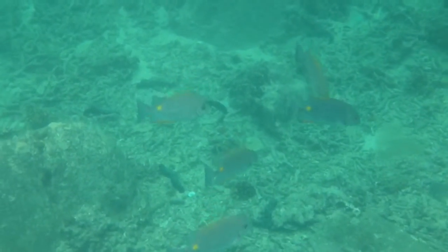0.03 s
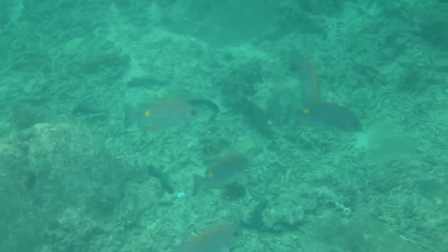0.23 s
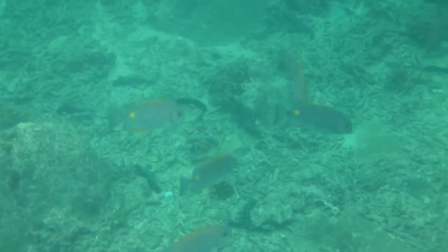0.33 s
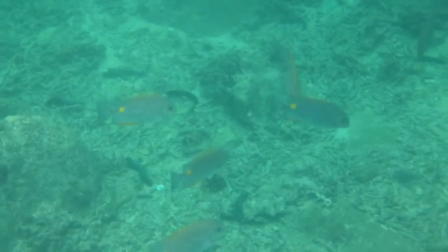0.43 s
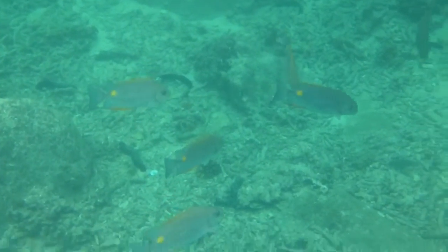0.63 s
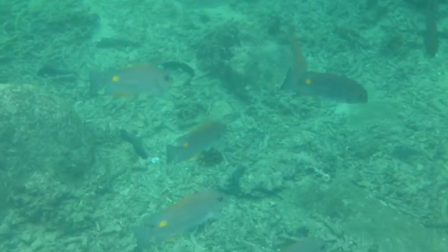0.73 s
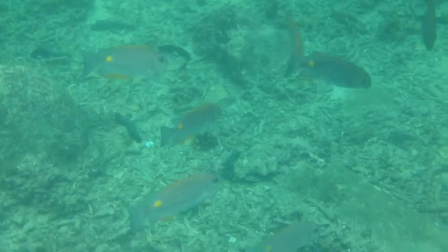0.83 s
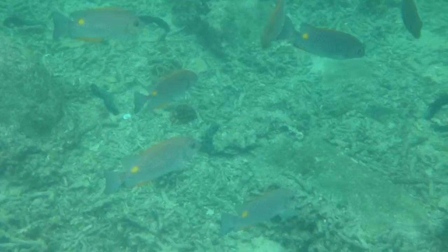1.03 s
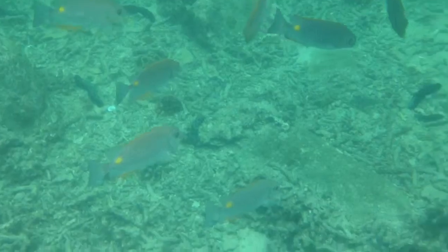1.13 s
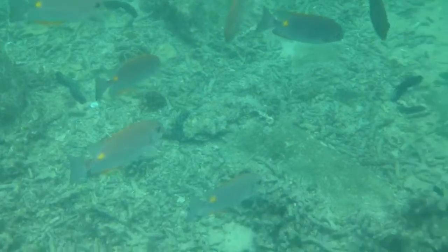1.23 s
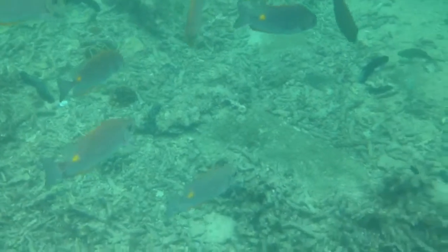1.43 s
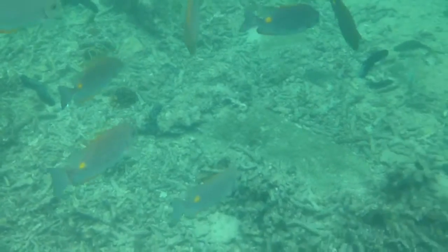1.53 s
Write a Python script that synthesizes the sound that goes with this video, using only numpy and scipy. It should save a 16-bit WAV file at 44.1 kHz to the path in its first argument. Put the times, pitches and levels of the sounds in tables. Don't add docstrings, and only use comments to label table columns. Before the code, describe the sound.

Dry underwater crackling of snapping shrimp, with muffled water thumps and a soft surging hum

```python
import sys
import numpy as np
from scipy import signal
from scipy.io import wavfile
from scipy.ndimage import uniform_filter1d

SR = 44100
rng = np.random.default_rng(int(sys.argv[2]) if len(sys.argv) > 2 else 0)


def file_out(sig):
    cols = np.atleast_2d(sig).T
    lim = np.clip(cols, -1, 1)
    pcm = np.round(lim * 32767).astype(np.int16)
    wavfile.write(sys.argv[1], SR, pcm)


def rack_gain(trim_db):
    fader = np.asarray(trim_db, float)
    return 10 ** (fader / 20)


N = 70560

ECHO_S = 0.001598


def rms_one(x):
    return x / np.sqrt(np.mean(x ** 2) + 1e-20)


def peak_one(x):
    return x / np.abs(x).max()


def cut(x, hz, kind, order=3):
    return signal.sosfilt(signal.butter(order, hz, kind, fs=SR, output="sos"), x)


def drift(rate_hz):
    r = np.exp(-2 * np.pi * rate_hz / SR)
    white = rng.standard_normal(N + SR)
    return rms_one(signal.lfilter([1], [1, -2 * r, r * r], white)[SR:])


def grains(rate_per_s, spread_db):
    sizes = rack_gain(spread_db * np.minimum(rng.exponential(1, N), 4.0)) * rng.choice([-1, 1], N)
    return sizes * (rng.random(N) < rate_per_s / SR)


def resonate(x, peaks):
    out = 0
    for k, (hz, width, db) in enumerate(peaks):
        r = np.exp(-np.pi * 1.5 * width / SR)
        b = np.array([1, 0, -1]) * (1 - r * r) / 2
        a = [1, -2 * r * np.cos(2 * np.pi * hz / SR), r * r]
        once = signal.lfilter(b, a, x + 1e-18)
        out = out + (-1) ** k * rack_gain(db) * signal.lfilter(b, a, once)
    return out


def shell_ring(x):
    # (frequency [Hz], width [Hz], level [dB])
    shell_modes = [(720, 230, 8.3), (1190, 523, 2.7), (1510, 374, 6.3), (2030, 680, 1.33)]
    return cut(resonate(x, shell_modes), 2500, "low")


def port_ring(x, hz):
    port_mode = [(hz, 1470, 0)]
    return resonate(resonate(x, port_mode), port_mode)


def edge_ring(x):
    # (frequency [Hz], width [Hz], level [dB])
    edge_modes = [(5960, 1900, 17), (7510, 2700, 0)]
    return resonate(resonate(x, edge_modes), edge_modes)


def reef_paths():
    scatter_db, scatter_t60_s, scatters_per_s = -17.5, 0.055, 2500
    t = np.arange(SR // 10) / SR
    paths = rng.standard_normal(len(t)) * (rng.random(len(t)) < scatters_per_s / SR)
    paths = paths * rack_gain(scatter_db - 60 * t / scatter_t60_s) * (t > ECHO_S)
    paths[0] = 1
    bounce_s = rng.uniform(0.00025, 0.0008)
    paths[int(bounce_s * SR)] = rack_gain(-6) * rng.choice([-1, 1])
    paths[int(ECHO_S * SR)] = rack_gain(-19.5)
    return paths


def near_shrimp():
    # (time [s], shell level [dB], port level [dB], rim level [dB], port pitch [Hz])
    early_snaps = [(0.0145, -54, -42.5, -54, 3900), (0.0211, -49.5, -34, -37.5, 4300),
                   (0.060, -48, -41, -64, 3900), (0.0657, -39, -38, -59.0, 3750),
                   (0.0879, -35.5, -32.5, -49, 4000), (0.092, -38.5, -36.5, -58, 5440),
                   (0.1159, -48.5, -37.5, -44, 3860), (0.1422, -52, -45, -49, 5200),
                   (0.1605, -76, -44, -49, 4700), (0.2255, -76, -63, -63, 4660),
                   (0.2567, -42, -44.5, -64, 4070), (0.2624, -73, -48, -50, 5170),
                   (0.2864, -46.5, -39.5, -62, 4300), (0.3174, -45, -36.5, -66, 4070),
                   (0.3446, -55, -45, -54, 3900), (0.3933, -41.5, -33.5, -39, 4430),
                   (0.4035, -46.0, -48, -53, 4740), (0.426, -59, -59, -60.0, 4800),
                   (0.4303, -73, -43.0, -51, 4300), (0.5165, -50.5, -43.5, -56, 4070)]
    # (time [s], shell level [dB], port level [dB], rim level [dB], port pitch [Hz])
    middle_snaps = [(0.5419, -52, -43.5, -47.5, 4850), (0.6097, -44.5, -44, -51, 3800),
                    (0.6172, -50, -44.5, -54, 4460), (0.6729, -44.5, -33, -46, 4410),
                    (0.689, -69, -47, -46, 4600), (0.722, -48.5, -59, -55, 5000),
                    (0.8122, -32.5, -33.5, -61, 4330), (0.8414, -32.5, -32, -39.5, 4570),
                    (0.8454, -55, -40, -64.0, 4130), (0.8503, -48, -52, -71, 3900),
                    (0.8925, -48, -45, -59, 4080), (0.936, -50, -53, -62, 4100),
                    (0.9409, -41.5, -31, -40.5, 4440), (1.004, -46, -46.5, -60, 4400),
                    (1.0192, -54, -46, -59, 4340), (1.0365, -40, -43, -64.0, 4000),
                    (1.0442, -33, -45, -55, 3830), (1.047, -41.5, -38.5, -58, 3660),
                    (1.08, -48, -35, -36, 4450), (1.1178, -55, -62, -60, 4750)]
    # (time [s], shell level [dB], port level [dB], rim level [dB], port pitch [Hz])
    late_snaps = [(1.1341, -30.5, -28.5, -43, 3600), (1.136, -47, -39, -56, 4230),
                  (1.158, -53, -46, -57, 4150), (1.214, -44, -65, -70, 4500), (1.2741, -51, -58, -52, 4350),
                  (1.293, -44.5, -46, -53, 3900), (1.3286, -39.5, -62, -49.5, 3240),
                  (1.335, -41.5, -57, -55, 4540), (1.3648, -48, -40.5, -51, 4300),
                  (1.4072, -50, -43, -52, 3680), (1.434, -38, -27.5, -41, 4660),
                  (1.4483, -49.5, -62, -49, 5500), (1.4788, -54.0, -40.5, -65.0, 4100),
                  (1.4899, -58, -52, -50, 5700), (1.4975, -59, -42.0, -62.0, 4340),
                  (1.507, -55, -45, -60, 4300), (1.5519, -44.5, -47, -52, 5350),
                  (1.5563, -49, -41.5, -64.0, 4000), (1.561, -44.5, -39, -62.0, 3980),
                  (1.5732, -45.5, -46, -52, 4440)]
    lead_s, lead_db = 0.00157, -17.5
    out = np.zeros(N + SR)
    click = np.arange(SR // 40) == 0
    shell = peak_one(shell_ring(click))
    edge = peak_one(edge_ring(click)) + rack_gain(-5) * cut(click, 9000, "high")
    for s, shell_db, port_db, edge_db, hz in early_snaps + middle_snaps + late_snaps:
        port = peak_one(port_ring(click, hz))
        ring = rack_gain(shell_db) * shell + rack_gain(port_db) * port + rack_gain(edge_db) * edge
        snap = signal.fftconvolve(ring, reef_paths())
        start, jet = int(s * SR), int((s - lead_s) * SR)
        out[start:start + len(snap)] -= snap
        out[jet:jet + len(port)] += rack_gain(port_db + lead_db) * port
    return out[:N]


def pops():
    # (time [s], peak level [dB], first pitch [Hz], last pitch [Hz], decay time [s])
    pop_events = [
        (.0654, -41, 2400, 1000, .0012),
        (1.1341, -32, 2600, 900, .002),
        (1.2092, -33, 2200, 1100, .0015),
        (1.2103, -33, 1500, 800, .002),
        (1.3287, -25, 2900, 760, .002),
        (1.3317, -38, 1900, 1300, .003),
    ]
    fall_s, rise_s = 0.00034, 0.00016
    out, t = np.zeros(N + SR), np.arange(SR // 40) / SR
    for s, db, first_hz, last_hz, dying_s in pop_events:
        cycles = last_hz * t + (first_hz - last_hz) * fall_s * (1 - np.exp(-t / fall_s))
        pop = (1 - np.exp(-t / rise_s)) * np.exp(-t / dying_s) * np.sin(2 * np.pi * cycles)
        paths = reef_paths()
        paths[1:int(ECHO_S * SR)] = 0
        pop = signal.fftconvolve(pop, paths)
        start = int(s * SR)
        out[start:start + len(pop)] += rack_gain(db) * pop
    return out[:N]


def swelling_tones(events):
    sag_per_cycle = 0.025
    out, t = np.zeros(N + SR), np.arange(SR // 10) / SR
    for s, db, hz, swell in events:
        u = t * hz / swell
        cycles = np.log1p(sag_per_cycle * u / swell) / sag_per_cycle * swell ** 2
        tone = u * np.exp(1 - u) * np.sin(2 * np.pi * cycles)
        start = int(s * SR)
        out[start:start + len(t)] -= rack_gain(db) * cut(tone, 2.6 * hz, "low", order=2)
    return out[:N]


def water_knocks():
    # (time [s], peak level [dB], pitch [Hz], swell [cycles])
    knock_events = [(0.0655, -29.5, 98, 0.28), (0.107, -43, 150, 0.9), (.168, -33, 570, 1.2),
                    (0.193, -36.5, 168, 1.07), (.214, -35, 150, 0.88), (0.2357, -14, 198, 0.35),
                    (0.25, -36, 620, 0.86), (.256, -37, 173, 0.7), (.270, -31, 140, 0.3),
                    (.290, -33.5, 140, 0.22), (.347, -37, 205, 1.43), (0.4394, -36, 208, 1.13),
                    (.462, -47, 623, 1.6), (.494, -44, 208, 0.89), (0.542, -43, 474, 0.97),
                    (0.647, -37, 158.7, 0.83), (.745, -44.5, 560, 3.4), (.851, -34.5, 560, 3.4),
                    (.903, -40.5, 560, 2.3), (1.014, -35.5, 215, 1.85), (1.045, -35, 188, 1.25),
                    (1.140, -41, 205, 1.5), (1.2137, -35, 755, 1), (1.227, -42, 150, 0.22),
                    (1.333, -39, 734, 1.25), (1.374, -38, 136, 0.47), (1.466, -45, 102, 0.32),
                    (1.554, -44, 101, 0.5)]
    return swelling_tones(knock_events)


def small_bubbles():
    # (time [s], peak level [dB], pitch [Hz], swell [cycles])
    bubble_events = [(.055, -50, 760, 2.8), (.096, -52.5, 595, 1.2), (.111, -48.5, 762, 2.45),
                     (.293, -48.5, 450, 1.3), (.318, -44, 800, 0.99), (.346, -42, 528, 1.6),
                     (.357, -47, 560, 1.5), (.3935, -36.5, 790, 0.66), (.397, -49, 526, 1.2),
                     (.425, -42.5, 720, 0.61), (.539, -50.5, 750, 1.7), (.328, -54, 774, 0.91),
                     (.441, -47, 442, 1.1), (.490, -47, 487, 1.2), (.589, -45, 516, 1.8),
                     (.628, -46, 450, 1.15), (.672, -52, 626, 0.88), (.993, -42.5, 580, 2.3),
                     (1.107, -47.5, 560, 2.8), (1.223, -41, 760, 1.5), (1.4346, -32.5, 800, 0.73)]
    return swelling_tones(bubble_events)


def surge_hum():
    # (time [s], low hum level [dB], upper hum level [dB])
    surge_levels = [
        (0, -56, -63.5),
        (.22, -55.5, -64),
        (.47, -63.5, -68.5),
        (.62, -52, -59),
        (.8, -43.5, -51.5),
        (1.06, -47, -53),
        (1.25, -49.5, -55.5),
        (1.6, -53.5, -57),
    ]
    # (frequency [Hz], width [Hz], level [dB])
    low_modes = [(150, 27, 0), (205, 50.3, 4), (117, 146, -13)]
    # (frequency [Hz], width [Hz], level [dB])
    upper_modes = [(560, 36.4, 3), (624, 76, -9.5), (800, 265, -16), (470.3, 96, -5)]
    trims = [1.5, 4]
    even_s, even_share = 0.04, 0.7
    s, *levels = np.transpose(surge_levels)
    out = 0
    for modes, db, trim_db in zip([low_modes, upper_modes], levels, trims):
        eddies = grains(900, 1.8) * rack_gain(4 * drift(38.6))
        ring = resonate(eddies, modes)
        ring = ring / uniform_filter1d(ring ** 2, int(even_s * SR)) ** (even_share / 2)
        out = out + rack_gain(np.interp(np.arange(N) / SR, s, db) + trim_db) * rms_one(ring)
    return out


def far_shrimp():
    far_levels = [-68.5, -64, -73.5]
    port_pitches_hz = [3900, 4300, 4700, 5430]
    far = grains(1000, 3.3)
    dealt = rng.integers(0, len(port_pitches_hz), N)
    shell, port, edge = far * rack_gain(-0.5 * rng.standard_normal((3, N)))
    port = sum(port_ring(port * (dealt == k), hz) for k, hz in enumerate(port_pitches_hz))
    rings = [shell_ring(shell), port, edge_ring(edge)]
    return sum(rack_gain(db) * rms_one(x) for db, x in zip(far_levels, rings))


def water_noise():
    # (frequency [Hz], density [dB per Hz])
    spectrum = [(22, -20), (50, -42), (195, -2.5), (315, -11.5), (520, -23), (2900, -32.5), (4500, -22.5),
                (9000, -44)]
    out, edges = 0, 22 * 2 ** np.arange(0, 9.1, .5)
    white = rng.standard_normal((2, N + SR))
    hz, db = np.transpose(spectrum)
    for k, (low, high) in enumerate(zip(edges, edges[1:])):
        band = cut(white[k % 2], [low, high], "band", order=2)[SR:]
        out = out + rack_gain(np.interp(np.log(low * high) / 2, np.log(hz), db)) * band
    return rack_gain(-62) * rms_one(out)


def preamp_hiss(shape):
    hiss = cut(rng.standard_normal(shape), 15500, "high", order=2)
    return rack_gain(-69.5) * rms_one(hiss)


def scene():
    pushes = cut(water_knocks() + small_bubbles(), 82, "high")
    return (near_shrimp() + pops() + pushes + surge_hum() + far_shrimp() + water_noise())[None]


def roll_off(x):
    return signal.sosfilt(signal.butter(12, 16190, fs=SR, output="sos"), x)


def record(dry):
    x = dry + preamp_hiss(dry.shape)
    x = signal.sosfilt(signal.cheby2(20, 30, 15310, fs=SR, output="sos"), x)
    return roll_off(x)


dry = scene()
out = record(dry)
file_out(out)
```